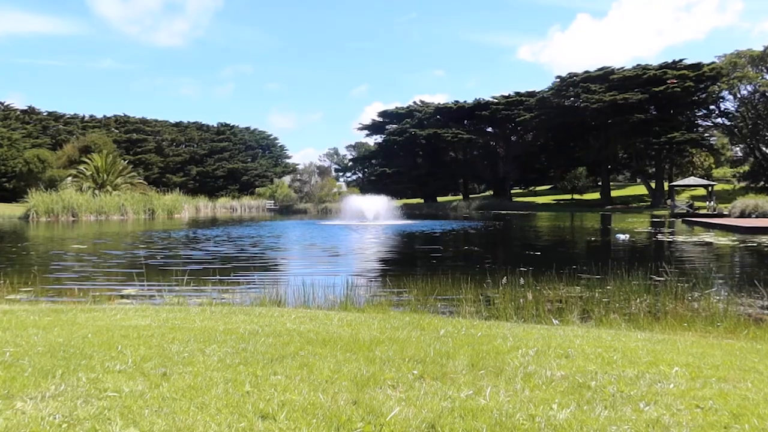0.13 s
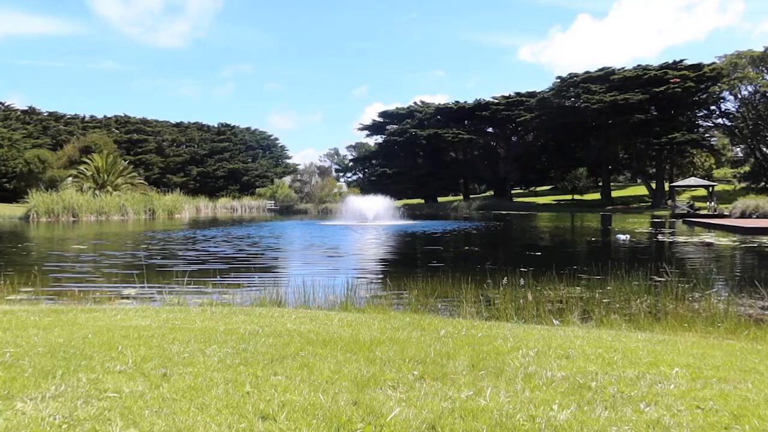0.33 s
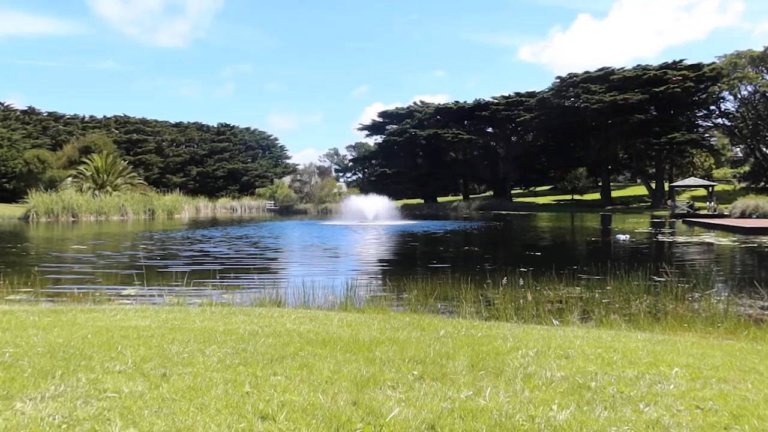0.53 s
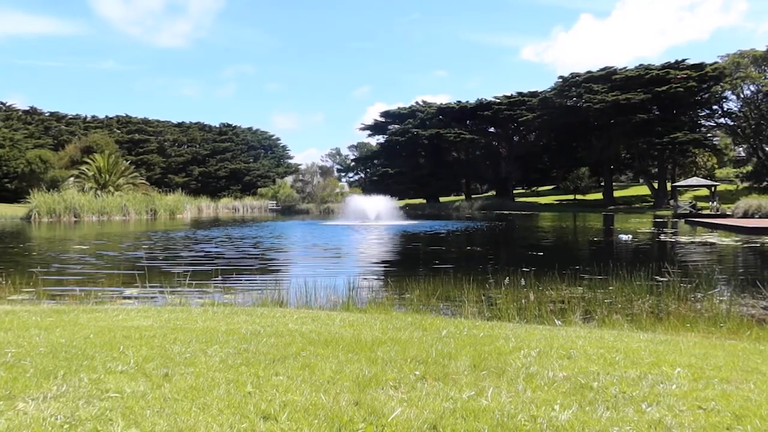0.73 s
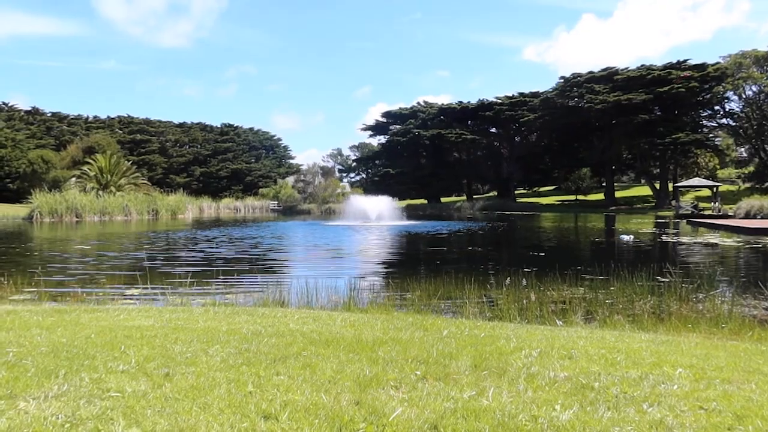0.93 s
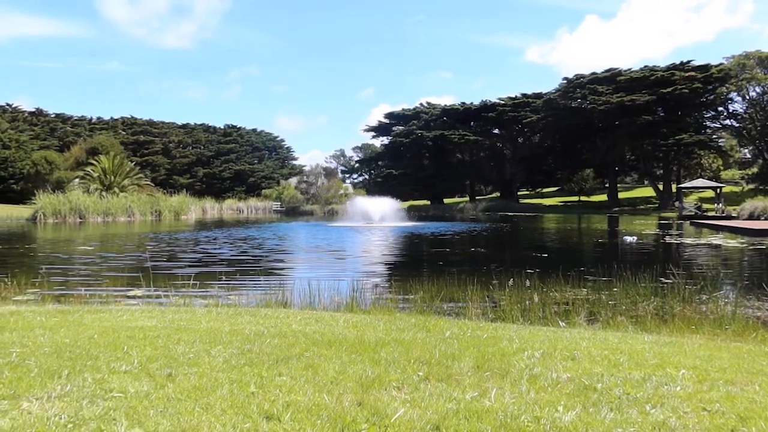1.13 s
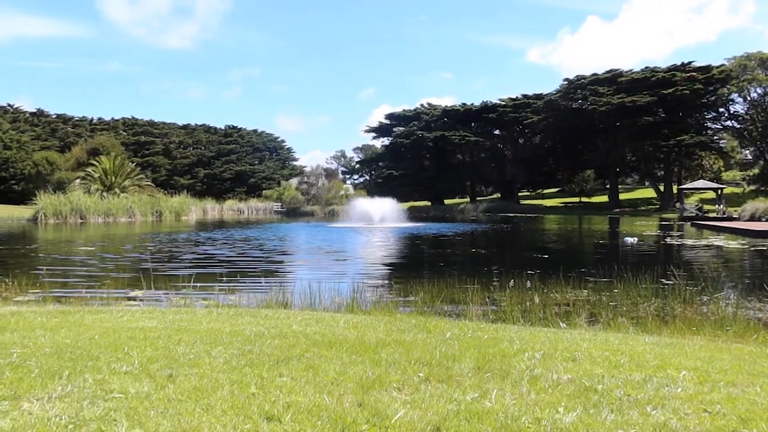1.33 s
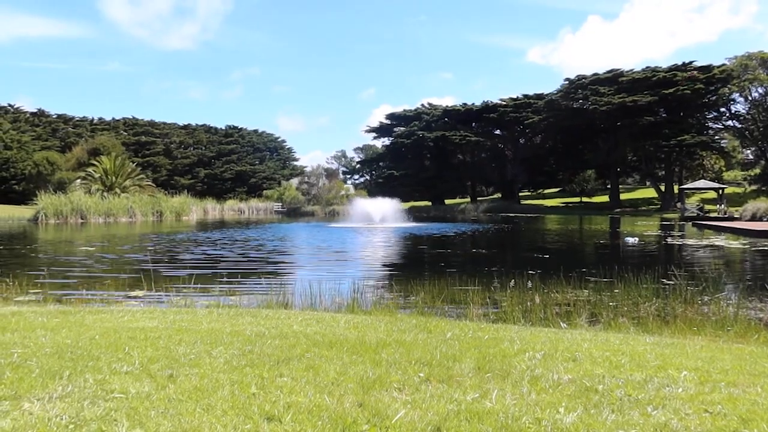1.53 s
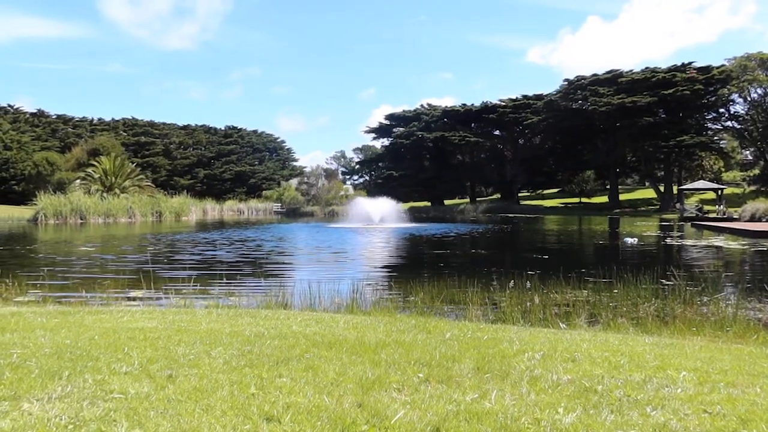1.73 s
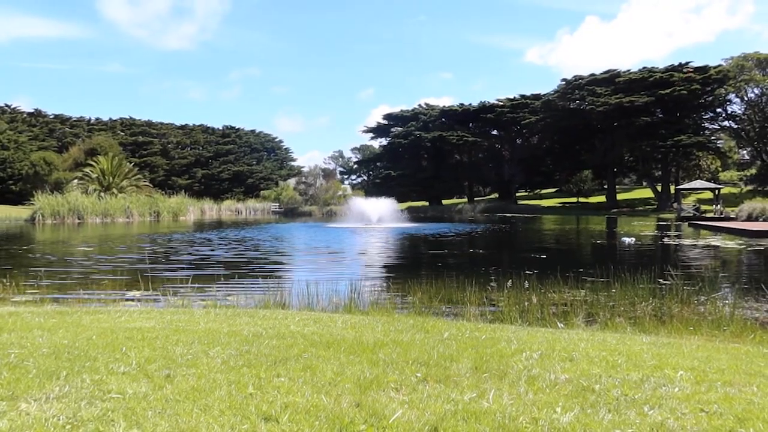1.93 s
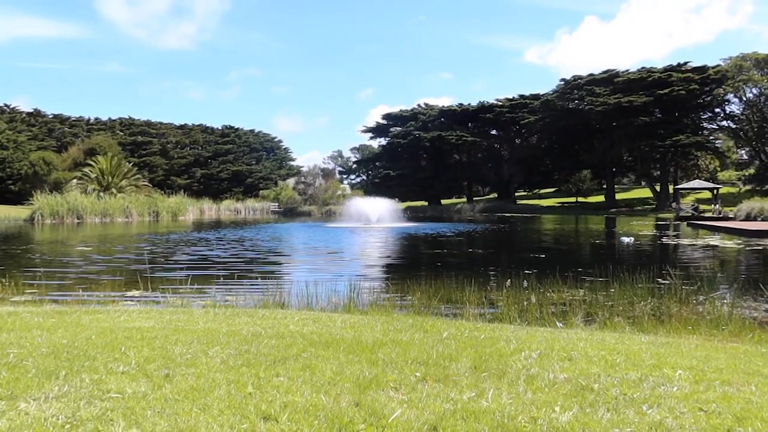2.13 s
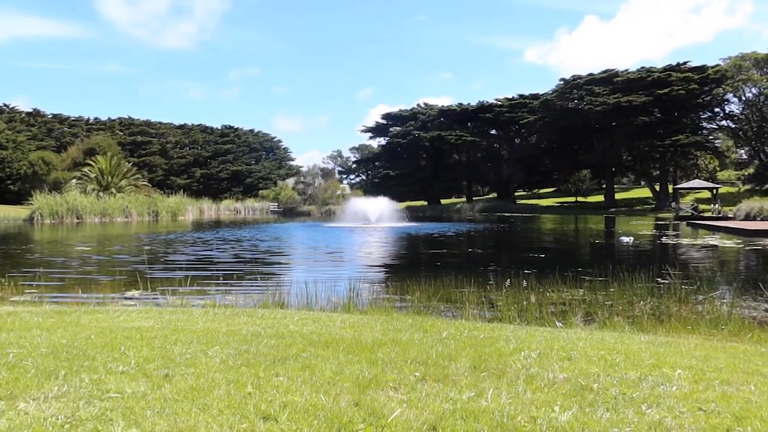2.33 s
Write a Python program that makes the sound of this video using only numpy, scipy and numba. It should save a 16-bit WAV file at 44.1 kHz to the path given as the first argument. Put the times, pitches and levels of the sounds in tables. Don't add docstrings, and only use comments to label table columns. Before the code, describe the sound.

A pond fountain splashes in a dense, even hiss from start to end, with occasional watery plops and a brief surge near the end; faint pump hum, light wind buffeting, outdoors, one distant microphone.

```python
import sys
import numpy as np
from scipy import signal
from scipy.fft import rfft, irfft
from scipy.io import wavfile
from scipy.ndimage import uniform_filter1d
from numba import njit

SR = 44100
rng = np.random.default_rng(int(sys.argv[2]) if len(sys.argv) > 2 else 0)


def to_linear_factor(level_db):
    exponent = np.asarray(level_db, float) / 20
    return 10 ** exponent


def generate_wav(signal):
    frames = np.transpose(np.atleast_2d(signal))
    scaled = np.clip(frames, -1, 1) * 32767
    pcm = np.round(scaled).astype(np.int16)
    wavfile.write(sys.argv[1], SR, pcm)


N = 108927

# (time [s], level [dB])
WATER_LEVEL = [
    (.06, -29),
    (.22, -29),
    (.6, -29),
    (1.0, -29.5),
    (1.5, -29),
    (2.1, -29),
    (2.14, -27),
    (2.18, -26.5),
    (2.2, -28),
    (2.47, -28),
]
# (frequency [Hz], density [dB per Hz])
SPRAY_COLOUR = [(120, -20), (400, -5), (1100, -8), (2300, -9.5), (4650, -13), (4900, -13), (6300, -20.5),
                (15700, -48.5)]
# (frequency [Hz], width [Hz], boost [dB])
HOUSING_RESONANCES = [
    (1467, 340, 6.5),
    (1850, 740, 6.5),
    (2790, 280, 4),
    (3970, 530, 2.5),
    (8300, 1300, 5),
]
# (pitch [Hz], pitch wander [Hz], column in PUMP_LEVELS [index])
PUMP_NOTES = [
    (198, 2, 1),
    (239, 1.2, 2),
    (322, 2.5, 3),
]
# (time [s], low level [dB], middle level [dB], high level [dB])
PUMP_LEVELS = [(0.06, -49, -52, -45.5), (0.16, -63, -39.5, -41.5), (0.37, -37, -38, -55),
               (0.44, -51, -42.5, -46), (0.63, -42, -48, -58), (0.66, -46, -45, -43),
               (0.76, -50.5, -43, -53), (0.95, -43.5, -41.5, -46), (1.42, -50, -48.5, -46.5),
               (1.45, -51, -67, -47), (1.52, -45, -39, -49), (1.57, -48.5, -51, -39),
               (1.88, -50, -39.5, -56.5), (1.95, -40.5, -45.5, -47.5), (2.03, -47, -34.5, -46.5),
               (2.25, -49, -43.5, -45.5), (2.32, -46, -41, -57), (2.47, -51, -39, -42.5)]
# (frequency [Hz], density [dB per Hz])
RUMBLE_COLOUR = [(20, -39), (55, -37), (130, 1.5), (200, 13.5), (300, 14.5), (420, -6), (700, -17.5)]
# (time [s], level [dB])
BREEZE_LEVEL = [
    (0.06, -54.5),
    (0.07, -54),
    (0.33, -52),
    (1.56, -56.5),
    (2.46, -52.5),
    (2.47, -52),
]
# (frequency [Hz], density [dB per Hz])
REED_COLOUR = [(5500, -31), (6800, -4), (8000, 2), (9200, 0), (10500, -9), (13000, -18.5), (14500, -32),
               (15700, -33)]
# (time [s], level [dB])
GUST_LEVEL = [(0.06, -65), (0.16, -34.5), (0.19, -42), (0.27, -35), (0.31, -44), (0.38, -34.5), (0.44, -46),
              (0.53, -34.5), (0.57, -56), (1.34, -58), (1.37, -49.5), (1.5, -63), (1.6, -46), (1.72, -55.5),
              (2.24, -57), (2.27, -65), (2.45, -53), (2.47, -47)]
# (frequency [Hz], density [dB per Hz])
BUFFET_COLOUR = [(20, -31), (50, -6), (100, 6), (140, -0.5), (200, -7), (280, -22), (500, -35)]
# (time [s], peak [dB], pitch [Hz], length of ring [cycles])
BIG_DROPS = [(.3852, -14, 2200, 3), (1.2700, -15, 980, 6), (1.2732, -17, 1650, 7), (1.9113, -13, 2200, 3),
             (2.138, -14, 1500, 6), (2.146, -18, 1900, 10), (2.172, -18, 1600, 10), (2.180, -17, 1600, 7),
             (1.424, -18, 1900, 3), (1.007, -20, 1400, 5), (2.405, -18, 1750, 4), (.511, -20, 1460, 5),
             (1.764, -20, 1700, 6), (1.293, -24, 2750, 14), (1.097, -22, 3800, 5), (.372, -21, 2050, 8),
             (.067, -18, 1900, 5), (.088, -19, 1900, 5)]
# (frequency [Hz], gain [dB])
BIG_DROP_COLOUR = [(100, -28), (500, -19), (900, -2.5), (3500, 7), (5000, -15), (9000, -29)]
# (frequency [Hz], gain [dB])
MICROPHONE_RESPONSE = [(15, -24), (45, 0), (4700, 0), (4880, -3), (5600, 0), (14600, 0), (15300, -3)]

TICKS_PER_S, TICK_SPREAD_DB, TICK_DB = 9000, 2.5, -6
BUBBLES_PER_S, BUBBLE_SPREAD_DB, BUBBLE_DB = 3000, 2.6, -4
BUBBLE_LOW_HZ, BUBBLE_HIGH_HZ, BUBBLE_CYCLES = 700, 4800, 8
BUBBLE_GLIDE = .12
LARGEST_DB = 10
SURGE_DB, FLICKER_DB = 0, 1.5
RUMBLE_DB = -43


def unit(x):
    return x / np.sqrt(np.mean(x ** 2))


def curve(rows):
    s, db = np.array(rows).T
    return to_linear_factor(np.interp(np.arange(N) / SR, s, db))


def colour(x, points, peaks=()):
    size = 8192
    hz = np.maximum(np.fft.rfftfreq(size, 1 / SR), 1)
    point_hz, point_db = np.array(points).T
    db = np.interp(np.log(hz), np.log(point_hz), point_db)
    db = db + sum(boost / (1 + (2 * (hz - centre) / width) ** 2) for centre, width, boost in peaks)
    cepstrum = irfft(db * np.log(10) / 20)
    causal = np.concatenate([cepstrum[:1], 2 * cepstrum[1:size // 2], np.zeros(size // 2)])
    impulse = irfft(np.exp(rfft(causal)))
    return signal.fftconvolve(x, impulse)[:N]


def walk(rate):
    hold = int(SR / rate)
    levels = rng.standard_normal(N // 400 + 2)[:N // hold + 1]
    steps = np.repeat(levels, hold)
    smooth = uniform_filter1d(uniform_filter1d(steps, hold), hold)[:N]
    return unit(smooth - smooth.mean())


def sizes(chance, spread_db):
    return to_linear_factor(np.minimum(-spread_db * np.log(1 - chance), LARGEST_DB))


@njit
def rings(n, at, turn, cycles, size, glide):
    out = np.zeros(n)
    for k in range(len(at)):
        length = int(cycles[k] * 2 * np.pi / turn[k])
        z, w, fade = size[k] + 0j, turn[k], np.exp(-3. / length)
        for i in range(at[k], min(at[k] + 2 * length, n)):
            out[i] += z.imag
            z *= fade * np.exp(1j * w)
            w *= 1 + glide / length
    return out


def drop_ticks():
    struck, side, chance = rng.random((N, 3)).T
    hits = struck < TICKS_PER_S / SR
    return hits * np.sign(side - .5) * sizes(chance, TICK_SPREAD_DB)


def small_bubbles():
    born, pitch, chance, length = rng.random((N, 4)).T
    at = np.nonzero(born < BUBBLES_PER_S / SR)[0]
    hz = BUBBLE_LOW_HZ * (BUBBLE_HIGH_HZ / BUBBLE_LOW_HZ) ** pitch[at]
    size = sizes(chance[at], BUBBLE_SPREAD_DB) * hz
    cycles = BUBBLE_CYCLES * (.5 + length[at])
    return rings(N, at, 2 * np.pi * hz / SR, cycles, size, BUBBLE_GLIDE)


def spray():
    ticks = unit(drop_ticks())
    bubbles = unit(small_bubbles())
    mist = rng.standard_normal(N) * to_linear_factor(FLICKER_DB * walk(39.9))
    water = mist + to_linear_factor(TICK_DB) * ticks + to_linear_factor(BUBBLE_DB) * bubbles
    distant = unit(colour(water, SPRAY_COLOUR, HOUSING_RESONANCES))
    return distant * curve(WATER_LEVEL) * to_linear_factor(SURGE_DB * walk(11.6))


def pump():
    out = to_linear_factor(RUMBLE_DB) * unit(colour(rng.standard_normal(N), RUMBLE_COLOUR))
    levels = np.array(PUMP_LEVELS)
    for hz, wander_hz, column in PUMP_NOTES:
        pitch = hz + wander_hz * walk(14)
        note = np.sqrt(2) * np.sin(2 * np.pi * np.cumsum(pitch) / SR)
        out = out + note * curve(levels[:, [0, column]])
    return out


def reeds():
    hiss = unit(colour(rng.standard_normal(N), REED_COLOUR))
    flutter = to_linear_factor(.5 * walk(17))
    return hiss * curve(BREEZE_LEVEL) * to_linear_factor(9) * flutter


def gust():
    air = colour(rng.standard_normal(N), BUFFET_COLOUR)
    power = uniform_filter1d(uniform_filter1d(air ** 2, size=1500), size=1500)
    return air / np.sqrt(power + 1e-18) * curve(GUST_LEVEL)


def plops():
    s, db, hz, cycles = np.array(BIG_DROPS).T
    at = (s * SR).astype(np.int64)
    ringing = rings(N, at, 2 * np.pi * hz / SR, cycles, to_linear_factor(db), BUBBLE_GLIDE)
    return colour(ringing, BIG_DROP_COLOUR)


def scene():
    air = spray() + pump() + reeds() + gust() + plops()
    mono = colour(air, MICROPHONE_RESPONSE)
    return np.array([mono, mono])


def roll_off(x):
    return signal.sosfilt(signal.butter(12, 15640, fs=SR, output="sos"), x)


def record(dry):
    start_s, opening_s, top_hz = .057, .001, 15730
    opened = dry * np.clip((np.arange(N) / SR - start_s) / opening_s, 0, 1)
    treble_cut = signal.ellip(10, .2, 60, top_hz, fs=SR, output="sos")
    mix = signal.sosfilt(treble_cut, opened)
    return roll_off(mix)


dry = scene()
out = record(dry)
generate_wav(out)
```